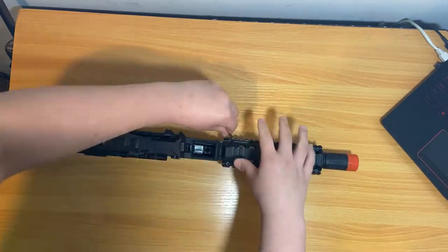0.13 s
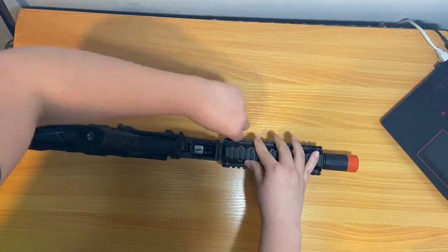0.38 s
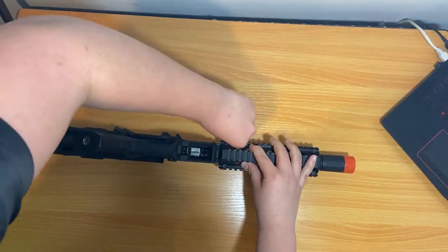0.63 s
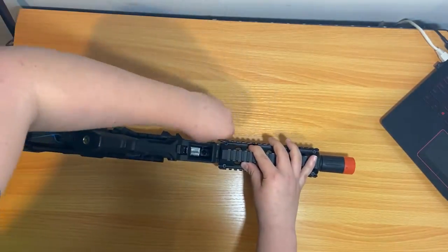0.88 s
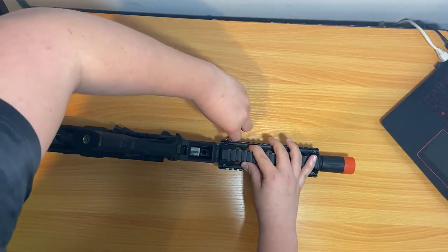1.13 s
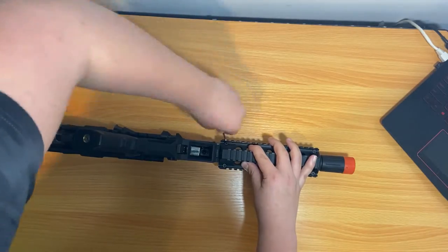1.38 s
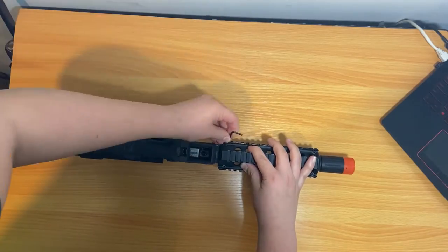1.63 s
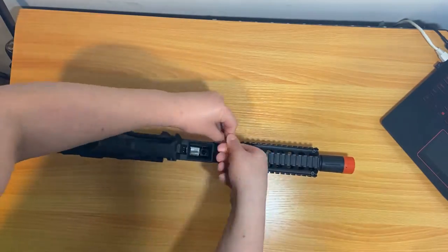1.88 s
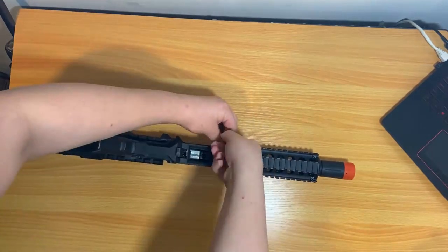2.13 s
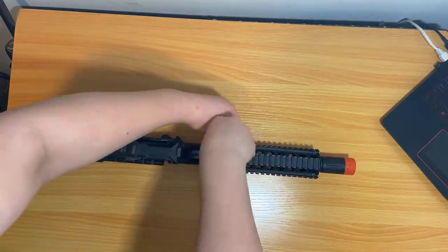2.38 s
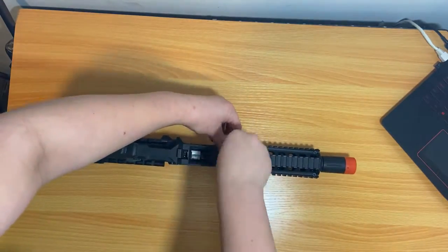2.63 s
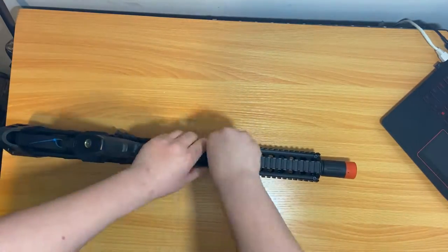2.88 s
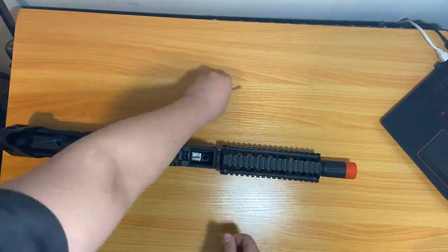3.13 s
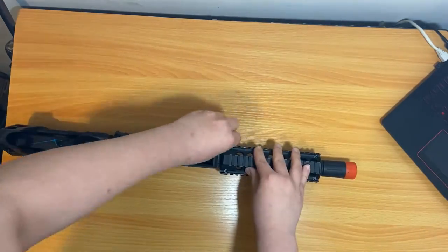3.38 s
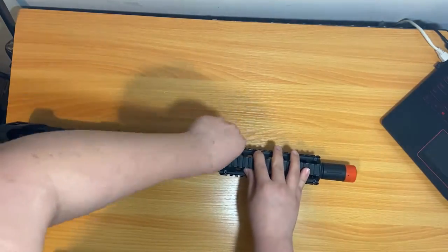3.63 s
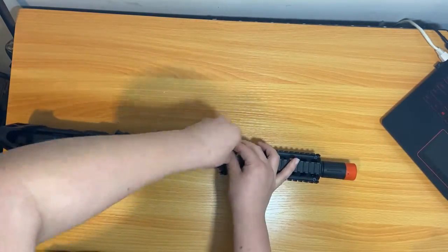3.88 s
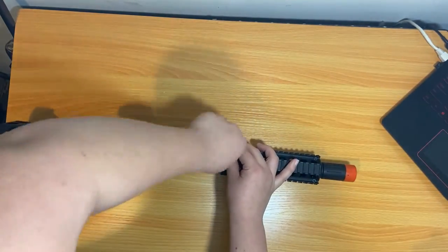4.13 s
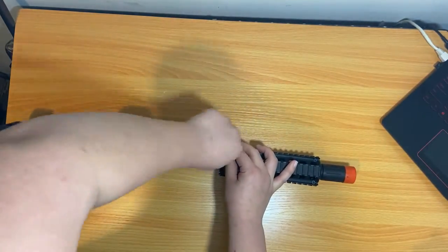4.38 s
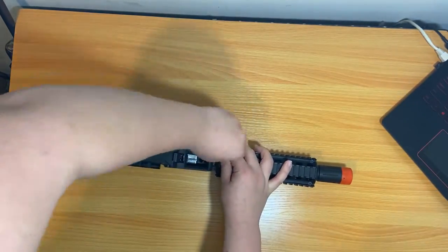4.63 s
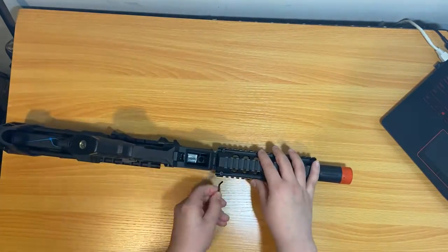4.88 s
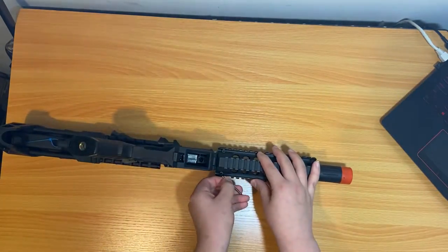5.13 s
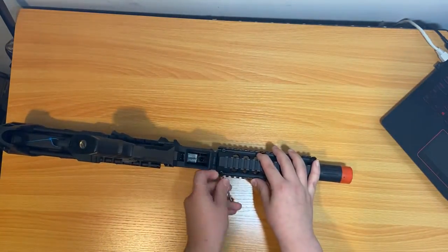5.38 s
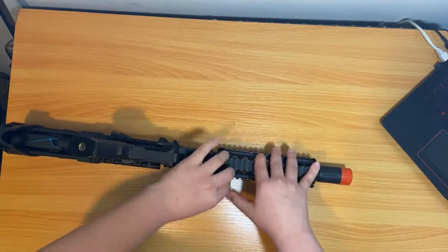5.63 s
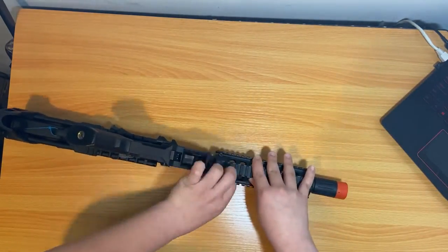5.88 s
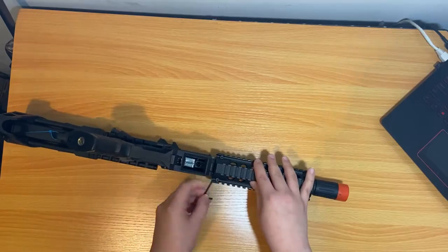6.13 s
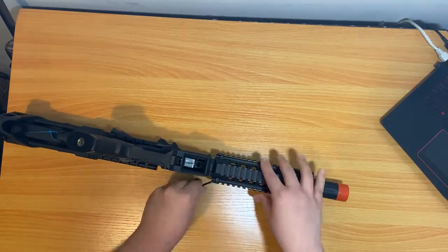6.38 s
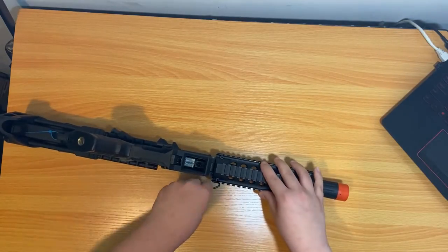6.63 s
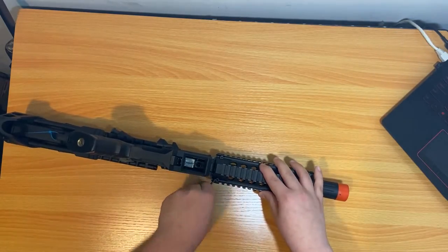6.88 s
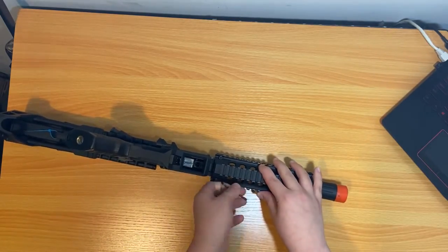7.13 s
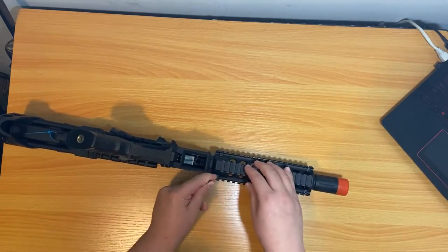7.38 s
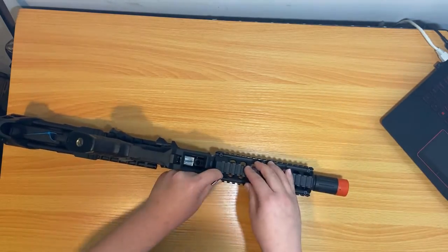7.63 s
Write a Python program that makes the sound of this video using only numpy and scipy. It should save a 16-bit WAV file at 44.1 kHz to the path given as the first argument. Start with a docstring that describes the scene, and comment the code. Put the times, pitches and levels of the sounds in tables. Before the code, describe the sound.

A quiet, dry room heard closely in stereo above a wooden desk, with faint air, a barely audible low drone and unsteady desk rumble. From 0 to 2 s, small crisp ticks of a hex key in screws come several times a second, some doubled and smeared as if sped up, with short gritty rubs and a dull thump near 0.7 s. From 2 to 2.9 s mostly soft scuffs and low bumps. At about 2.95 s the key drops: by far the loudest moment, rapid hard bounces on wood and a high, beating steel ring, damped by 3.2 s. Ticks resume at 3.3-3.5 s, a brighter rub follows at 3.8 s, then it is sparse. Light ticks return around 5 s, with thumps and a click near 5.7-5.9 s. After a lull, ticks restart at 6.6 s and cluster sharply from 7.3 to 7.65 s.

```python
"""A quiet room, a wooden desk, a pair of close microphone ports above it: air, faint tones, desk rumble.
From the start a hex key ticks in small screws of a ribbed plastic and metal handguard (filtered noise
cracks, each with the overlap repeats of sped-up playback), while hands rub it (gritty clicks) and nudge
it so that the desk thumps (decaying sines). Just before 3 s the key is dropped: it clatters (clicks through
desk modes) and rings in beating sines until fingers catch it. Then ticks, rubs and thumps go on."""
import sys
import numpy as np
from scipy import signal
from scipy.fft import rfft, irfft
from scipy.io import wavfile

SR = 44100
rng = np.random.default_rng(int(sys.argv[2]) if len(sys.argv) > 2 else 0)


def output_pcm(signal):
    """Save a mono or channel-first signal as 16-bit PCM at the path in sys.argv[1].

    Samples are clipped to [-1, 1] before scaling.
    """
    pcm = np.clip(np.atleast_2d(signal).T, -1, 1) * 32767
    wavfile.write(sys.argv[1], SR, np.round(pcm).astype(np.int16))


def ratio(d):
    """dB to gain"""
    e = np.asarray(d, float) / 20
    return 10 ** e


N = 342216
HZ = np.maximum(np.fft.rfftfreq(N, 1 / SR), 1)


def rms_one(x):
    """Scale to rms 1."""
    return x / np.sqrt(np.mean(x ** 2) + 1e-20)


def at_hz(points, hz):
    """Read a spectrum on a log frequency axis."""
    table_hz, value = np.array(points).T
    return np.interp(np.log(hz), np.log(table_hz), value)


def coloured(x, spectrum):
    """Give a signal the colour of a spectrum; rms 1."""
    return rms_one(irfft(rfft(x) * ratio(at_hz(spectrum, HZ)), N))


def drift(rate):
    """Slow chance with about rate new values per second, spread about 1."""
    knots = rng.standard_normal(int(N / SR * 60) + 2)
    place = np.arange(N) / SR * np.clip(rate, 1, 59)
    return np.interp(place, np.arange(len(knots)), knots) * 1.22   # makes up for the smoothing between knots


def ring(clicks, hz, t60):
    """A two-pole resonance: a unit click sets a decaying sine of height 1 ringing."""
    r, w = ratio(-60 / (t60 * SR)), 2 * np.pi * hz / SR
    return signal.lfilter([0, np.sin(w)], [1, -2 * r * np.cos(w), r * r], clicks + 1e-18)


def add(out, s, burst):
    """Lay a short sound down at time s."""
    i = int(s * SR)
    out[i:i + len(burst)] += burst[:N - i]


def grains(per_s, spread_db):
    """Stick-slip: clicks of uneven size and either sign at random moments."""
    sizes = ratio(spread_db * np.minimum(rng.exponential(1, N), 5)) * rng.choice([-1, 1], N)
    return sizes * (rng.random(N) < per_s / SR)


# phase by which the left microphone port leads: (frequency [Hz], phase [rad])
PORT_LEAD = [(0, 0), (3000, -.3), (5200, -1.0), (7600, 1.8), (8960, 3.14), (10340, 4.1), (11370, 6.1),
             (14300, 8.6)]
# left port minus right port: (frequency [Hz], level [dB])
PORT_TILT = [(200, .3), (3000, -3.5), (9000, 0)]


def port_pair():
    """Phase and level by which the two microphone ports differ, at every frequency."""
    side = np.array([[.5], [-.5]])
    phase = np.interp(HZ, *np.transpose(PORT_LEAD))
    return np.exp(1j * phase * side) * ratio(at_hz(PORT_TILT, HZ) * side)


# likeness of steady noise at the two ports: (frequency [Hz], likeness [0-1])
PORT_LIKENESS = [(60, 1), (300, 0.6), (700, 0.54), (8000, 0.02)]


def spread(spectrum):
    """Steady noise at the port pair: a shared part, and a part of opposite sign left and right."""
    mid, side = rfft(rng.standard_normal((2, N))) * ratio(at_hz(spectrum, HZ))
    alike = np.clip(at_hz(PORT_LIKENESS, HZ), 0, 1)
    shared = np.sqrt(1 + alike) * mid * port_pair()
    opposed = np.sqrt(1 - alike) * side * [[1], [-1]]
    return rms_one(irfft(shared + opposed, N))


# faint steady tones in the room: (frequency [Hz], t60 [s], level [dB])
ROOM_TONES = [(183.9, 0.054, -80.5), (11450, 0.026, -104)]


def hum():
    """Noise passed twice through narrow resonances: a low drone and a thin whine."""
    out = np.zeros(N)
    for hz, t60, level_db in ROOM_TONES:
        once = ring(rng.standard_normal(N), hz, t60)
        out += ratio(level_db) * rms_one(ring(once, hz, t60))
    return out


# colour of room air and faint rustle: (frequency [Hz], level [dB per Hz])
AIR_COLOUR = [(180, -32), (300, 1.5), (1000, -9), (8200, -23), (11400, -27.5), (14600, -50)]


def rustle(busy_db):
    """Room air and rustle: wide noise that drifts and follows half the swing of the hands in dB."""
    level_db = -83.5 + 0.5 * busy_db + 4.2 * drift(7.3)
    return ratio(level_db) * spread(AIR_COLOUR)


# how busy the hands are, heard as desk rumble: (time [s], level [dB])
HAND_ACTIVITY = [(0, -56), (.45, -69.5), (.8, -53), (1.3, -63.5), (2.5, -58.5), (3.3, -63.5), (4.3, -59.5),
                 (4.95, -64), (5.5, -63), (6.3, -68.5), (7, -61), (7.76, -61.5)]


def hand_activity():
    """The level of the desk rumble under the moving hands, sample by sample [dB]."""
    return np.interp(np.arange(N) / SR, *np.transpose(HAND_ACTIVITY))


# colour of the desk rumble: (frequency [Hz], level [dB per Hz])
RUMBLE_COLOUR = [(15, -32.5), (25, -13), (65, 0), (108, -7.5), (183, -10), (211, -23.5), (274, -25),
                 (500, -47.5), (1100, -120)]


def desk_rumble(level_db):
    """Low noise carried by the desk, unsteady as the hands work."""
    return ratio(level_db + 4.0 * drift(14)) * spread(RUMBLE_COLOUR)


# modes of the desk top: (frequency [Hz], level [dB])
DESK_MODES = [(180, -8), (269, 0), (340, -8), (480, -7), (668, -8), (1320, 0), (1610, -6), (2240, -8),
              (3106, -8), (3903, -7), (4705, -7)]


def in_wood(x, wood_db, t60):
    """Contacts on the desk top plus the modes they keep ringing; rms 1."""
    return rms_one(x + sum(ratio(db + wood_db) * ring(x, hz, t60) for hz, db in DESK_MODES))


# nudges felt through the desk: (time [s], level [dB], pitch [Hz])
NUDGES = [(0.659, -50, 284), (0.715, -36, 175), (1.528, -47, 80), (1.951, -38.5, 64.4), (2.264, -57, 177),
          (2.369, -50.5, 78), (2.465, -42, 181), (2.527, -42, 115), (2.762, -51.5, 175),
          (2.861, -42.5, 164.6), (3.494, -46.5, 60.3), (3.645, -52, 234.5), (4.632, -52.5, 301),
          (4.699, -43, 85), (5.606, -49, 178.8), (5.709, -37, 162), (5.8, -46, 65), (5.927, -37, 161.3),
          (7.605, -47, 183)]


def thumps():
    """A soft push rocks the desk for a few cycles, sways its frame and stirs its lower modes."""
    out, t = np.zeros(N), np.arange(8192) / SR
    pitches = [55, 90] + [hz for hz, db in DESK_MODES[:4]]   # frame sway, then desk top
    for s, peak_db, hz in NUDGES:
        phase = rng.uniform(0, 2 * np.pi, len(pitches) + 1)
        strength = rng.uniform(0.2, 0.75, len(pitches))
        rock = np.sin(2 * np.pi * hz * t + phase[-1]) * ratio(-60 * t / .12)
        for f, p, g in zip(pitches, phase, strength):
            fade = ratio(-60 * t * np.sqrt(f) / 2.7)   # higher modes die sooner
            rock += g * min(1, 190 / f) * np.sin(2 * np.pi * f * t + p) * fade
        rise = 1 - np.exp(-t / 0.0061)
        uneven = ratio(1.4 * np.interp(t * 70, np.arange(16), rng.standard_normal(16)))
        add(out, s - .006, ratio(peak_db) * rise * uneven * rock)
    return out


# resonances of handguard and screw that any contact may stir: [Hz]
BODY_HZ = [1900, 2660, 4220, 5370, 7630]


def stirred(hz, nearest_hz):
    """The resonance nearest the contact speaks; the others join by chance, a little off pitch."""
    nearest_db, sharpness = 7, 12   # sharpness: pitch over width
    share, off = rng.uniform(0, 1, (2, len(BODY_HZ)))
    others_hz = BODY_HZ * (1 + 0.04 * (off - .5))
    peaks = [(nearest_hz, ratio(nearest_db))] + list(zip(others_hz, share))
    return 1 + sum(g / (1 + 2j * sharpness * (hz / f - 1)) for f, g in peaks)


# short rubs and scuffs: (middle [s], length [s], level [dB], brightness [dB per octave],
# nearest resonance [Hz])
STROKES = [(0.048, 0.033, -58.5, -6.5, 1430), (0.22, 0.18, -69.5, -1.5, 2290),
           (0.597, 0.044, -68, -4.5, 5400), (0.666, 0.046, -56, -4, 1500), (0.955, 0.023, -66.5, -1, 685),
           (1.099, 0.069, -73, 2, 1320), (1.683, 0.032, -55, 3.5, 686), (1.732, 0.087, -57.5, 3, 2120),
           (1.813, 0.024, -63, -1, 3000), (2.24, 0.092, -63.5, -4.5, 1500),
           (2.394, 0.05, -60.5, -6.5, 1350), (2.518, 0.29, -71.5, -1, 1500),
           (2.617, 0.025, -54.5, -7, 1530), (2.686, 0.093, -63, -8, 1800), (2.862, 0.11, -65, -3, 1430),
           (2.937, 0.046, -63, 4, 4990), (3.406, 0.12, -61.5, 5, 676), (3.729, .04, -66, -6, 1815),
           (3.835, 0.11, -56, 0, 5700), (4.434, 0.069, -71, -2.5, 1554), (4.505, 0.14, -79.5, -5, 2600),
           (4.629, 0.069, -61.5, -4.5, 1480), (4.701, 0.068, -66.5, -1.5, 1120),
           (4.766, 0.094, -65.5, -0.5, 1204), (5.531, 0.18, -71.5, -6, 1414),
           (5.81, 0.091, -59, -7.5, 2550), (5.884, 0.043, -64.5, -3.5, 3900), (5.956, 0.065, -59, -1, 1063),
           (6.555, .07, -67, 8.5, 5500), (7.102, 0.093, -68, -3.5, 1357), (7.152, 0.044, -63, 3.5, 4820),
           (7.275, 0.12, -69.5, -5.5, 1380), (7.384, .11, -60.5, 4, 1900)]
# colour of the rubbing: (frequency [Hz], level [dB per Hz])
RUB_COLOUR = [(120, -29), (250, 3), (1000, -6), (5900, -12), (8400, -12.5), (11500, -21.5), (14600, -38.5)]


def rubs(busy_db):
    """Skin and plastic slide over wood in gritty strokes that swell and fade; faint scuffs fill in."""
    grit = in_wood(coloured(grains(5100, 1.9), RUB_COLOUR), wood_db=-47, t60=0.055)
    grit = grit * ratio(2.2 * drift(55))
    scuff_db = -86.5 + busy_db - 0.5 * drift(22)
    out = ratio(scuff_db) * rms_one(grit)
    for s, length_s, level_db, tilt_db, nearest_hz in STROKES:
        i, n = int((s - length_s / 2) * SR), int(length_s * SR)
        hz = np.maximum(np.fft.rfftfreq(n, 1 / SR), 150)
        colour = ratio(tilt_db * np.log2(hz)) * stirred(hz, nearest_hz)
        stroke = irfft(rfft(grit[i:i + n]) * colour, n)
        add(out, i / SR, ratio(level_db) * rms_one(stroke) * np.hanning(n))
    return out


# bounces of the dropped key: (time [s], level [dB])
KEY_BOUNCES = [(2.9467, -39), (2.9628, -14.5), (2.9755, -12), (2.9805, -4.5), (3.0114, -19), (3.0245, -13),
               (3.056, -20), (3.084, -21), (3.122, -29)]


def knocks():
    """Every bounce of the key strikes the desk's modes with new strengths."""
    level_db, follows, cycles = -30.5, .6, 22   # follows: share of the bounce's dB
    s, peak_db = np.transpose(KEY_BOUNCES)
    out = np.zeros(N)
    for hz, mode_db in DESK_MODES:
        chance_db = rng.normal(0, 1.3, len(s))
        clicks = np.zeros(N)
        clicks[(s * SR).astype(int)] = ratio(level_db + mode_db + follows * (peak_db - peak_db.max()) + chance_db)
        # the second mode rings for the given cycles, higher ones for less time
        out += ring(clicks, hz, cycles / np.sqrt(DESK_MODES[1][0] * hz))
    return signal.sosfilt(signal.butter(2, 200, "high", fs=SR, output="sos"), out)


# bending modes of the steel key, close pairs that beat: (frequency [Hz], level [dB], beats [per s])
KEY_MODES = [(1084, -11, 28), (6845, 0, 15), (12760, -17, 19), (14374, -20, 12.3)]
# colour of the chatter on the desk: (frequency [Hz], level [dB per Hz])
CLATTER_COLOUR = [(150, -19.5), (280, -10), (980, -8.5), (2900, -5.5), (6400, -9.5), (8800, -10.5),
                  (11000, -20), (14600, -43.5)]


def dropped_key():
    """The key bounces and chatters on the desk while its steel sings, until the fingers catch it."""
    touch_s, land_s, catch_s, still_s = 2.946, 2.975, 3.16, 3.215
    t = np.arange(N) / SR
    since = np.maximum(t - touch_s, 0)
    caught = np.maximum(t - catch_s, 0) / (still_s - catch_s)   # reaches 1 when all is still
    clatter = ratio(-31.5 - 26 * since - 29 * caught ** 2)   # weakens as the key settles
    clatter *= (1 - np.exp(-since / 0.029)) ** 2
    ringing = ratio(-20.5 - 60 * since - 48 * caught)   # t60 of 1 s when left free
    ringing *= (1 - np.exp(-since / 0.05)) ** 2
    wooden = in_wood(coloured(grains(6000, 1.9), CLATTER_COLOUR), wood_db=-36, t60=0.09)
    chatter = clatter * ratio(2.4 * drift(55)) * wooden
    blow = t[:2048]
    crack_band = signal.butter(2, [1600, 6000], "band", fs=SR, output="sos")
    for s, peak_db in KEY_BOUNCES:
        crack = rng.laplace(0, .7, len(blow)) * ratio(peak_db - 60 * blow / .018)
        crack *= 1 - np.exp(-blow / 0.0019)
        add(chatter, s, signal.sosfilt(crack_band, crack))
    steel = np.zeros(N)
    for hz, level_db, beats in KEY_MODES:
        beating = np.sin(np.pi * beats * (t - land_s))   # counted from the main landing
        steel += ratio(level_db) * np.sin(2 * np.pi * hz * t) * beating
    return chatter + knocks() + ringing * steel


# key and screw ticks: (time [s], level [dB], brightness [dB per octave],
# overlap repeat of the tick, from sped-up playback [dB], nearest resonance [Hz])
KEY_TICKS = [(0.1836, -44.5, -8.5, -8, 2350), (0.347, -61, 10, -5.5, 7050), (0.3859, -49.5, 14, -9.5, 2210),
             (0.709, -41.5, -4.5, 1, 5220), (0.883, -45, 9, -15.5, 2090), (1.031, -42, 5.5, -33, 3120),
             (1.0802, -57, 8, 0, 5600), (1.1768, -55.5, 5, -7.5, 5600), (1.2552, -49.5, 11, -19, 5330),
             (1.3346, -60.5, 4.5, -17, 4120), (1.4293, -62.5, 3, -7.5, 5450),
             (1.5274, -51.5, 4.5, -1, 7210), (1.5626, -55, 13.5, -1, 5220), (1.65, -51, -4.5, -1.5, 4160),
             (1.752, -47, 14, -25, 7210), (1.9498, -43.5, 3, -6, 1670), (3.323, -46, -8, 0.5, 4010),
             (3.4216, -40.5, 15, -37, 7500), (3.4932, -39.5, 1.5, -23, 5570),
             (3.704, -63.5, 9, -14.5, 3444), (4.988, -59.5, 2, -3, 5470), (5.0502, -52.5, 6.5, -2.5, 5660),
             (5.1722, -46, 12.5, -6.5, 5790), (5.699, -39.5, -7, 1.5, 5200), (5.775, -60.5, -13, -4, 2728),
             (6.5827, -49.5, 3, -8.5, 1900), (6.7277, -48, 8.5, -25, 5540), (6.8999, -52, 9, 0.5, 4030),
             (6.9654, -53, 3, -13, 7650), (7.3464, -50, 0, -2, 1860), (7.4019, -42.5, 0.5, -20, 1890),
             (7.448, -39, 2.5, -16.5, 5650), (7.5295, -57.5, -4, -8, 2720), (7.572, -48, -4.5, -11, 5540),
             (7.6025, -38, 3.5, -13, 1900), (7.6445, -39, 3, -22, 4460)]
# colour of the ticks: (frequency [Hz], level [dB per Hz])
TICK_SPECTRUM = [(600, -42), (1300, -19.5), (3600, -9), (7400, -6.5), (9000, -11.5), (11900, -16.5),
                 (14600, -38.5)]


def ticks():
    """Cracks in body resonances; sped-up playback adds a faint pre-echo, a smeared tail and a repeat."""
    pre_echo_s, repeat_delay_s = 0.017, 0.0152
    out, t = np.zeros(N), np.arange(8192) / SR - pre_echo_s   # the crack starts at t = 0
    hz, after = np.maximum(np.fft.rfftfreq(len(t), 1 / SR), 1), np.maximum(t, 0)
    later = np.maximum(t - repeat_delay_s, 0)
    pre_echo = ratio(-24.0) * (t < 0) * (1 + t / pre_echo_s)
    tail_fade = np.clip((.055 - t) / 0.052, 0, 1)   # the smeared tail fades out within about 55 ms
    for s, peak_db, tilt_db, repeat_db, nearest_hz in KEY_TICKS:
        noise = rng.standard_normal(len(t))
        uneven = ratio(2.0 * np.interp(after * 250, np.arange(64), rng.standard_normal(64)))
        crack = ratio(-60 * after / 0.033) + ratio(-16.0 - 60 * after / 0.022) * uneven
        crack *= 1 - np.exp(-after / 0.0012)
        repeat = ratio(repeat_db - 60 * later / 0.061) * (1 - np.exp(-later / 0.00029))
        contact = rfft(noise * (pre_echo + crack + repeat) * tail_fade)
        bright_db = tilt_db * np.log2(np.maximum(hz, 2000) / 4000)
        sharp = ratio(at_hz(TICK_SPECTRUM, hz) + bright_db) * stirred(hz, nearest_hz)
        # ticks with a louder overlap repeat also carry more dull body
        dull = ratio(8.5 + 0.5 * repeat_db) * np.exp(-(np.log2(hz / 450) / 2.0) ** 2)
        colour = sharp / np.sqrt(np.mean(np.abs(sharp) ** 2)) + dull
        add(out, s - .001 - pre_echo_s, ratio(peak_db) * irfft(contact * colour, len(t)))
    return out


def ports(x):
    """Direct sound through the close port pair; early echoes of the room differ on each side."""
    t60_s, echo_db = 0.072, -8
    t = np.arange(SR // 4) / SR
    echoes = rng.standard_normal((2, len(t))) * ratio(-60 * t / t60_s) * (t > .002)
    echoes = signal.sosfilt(signal.butter(2, [400, 6500], "band", fs=SR, output="sos"), echoes)
    echoes = echoes / np.sqrt(np.sum(echoes ** 2, axis=1, keepdims=True))
    direct = irfft(rfft(x) * port_pair(), N)
    return direct + ratio(echo_db) * signal.fftconvolve(x[None], echoes, axes=1)[:, :N]


def scene():
    """Contacts through the ports, over hum and over a rustle and desk rumble that follow the hands."""
    rumble_db = hand_activity()
    busy_db = rumble_db - rumble_db.mean()
    background = hum() + rustle(busy_db) + desk_rumble(rumble_db)
    contacts = thumps() + rubs(busy_db) + dropped_key() + ticks()
    return background + ports(contacts)


def band_limit(x):
    """A steep low-pass at the top of the band."""
    return signal.sosfilt(signal.butter(12, 14710, fs=SR, output="sos"), x)


def record(dry):
    """Take down the finished mix of the two ports."""
    return band_limit(dry)


dry = scene()
out = record(dry)
output_pcm(out)
```